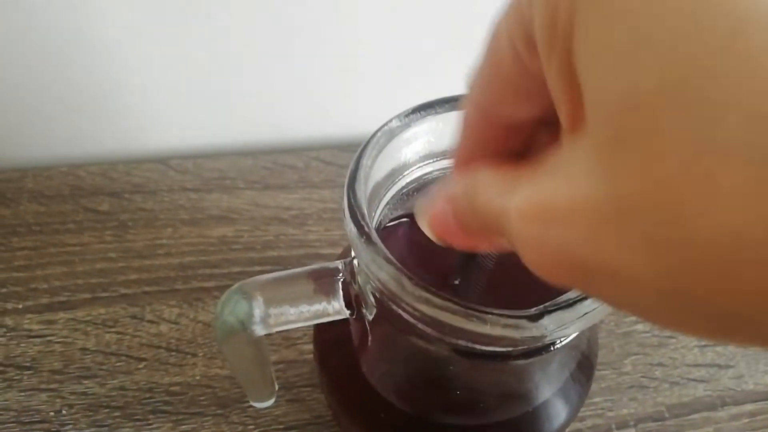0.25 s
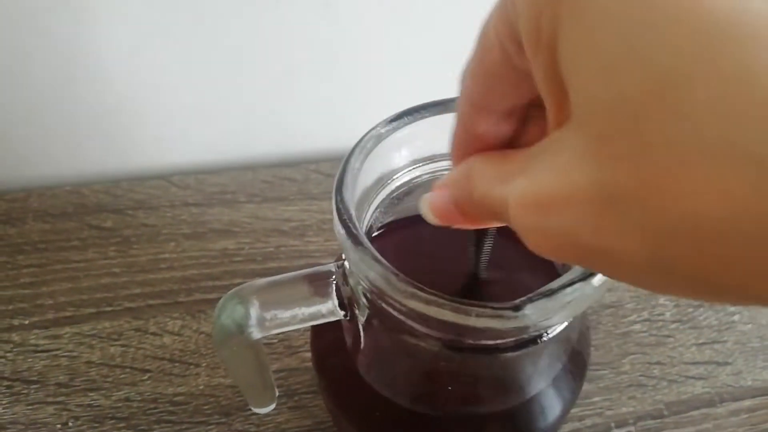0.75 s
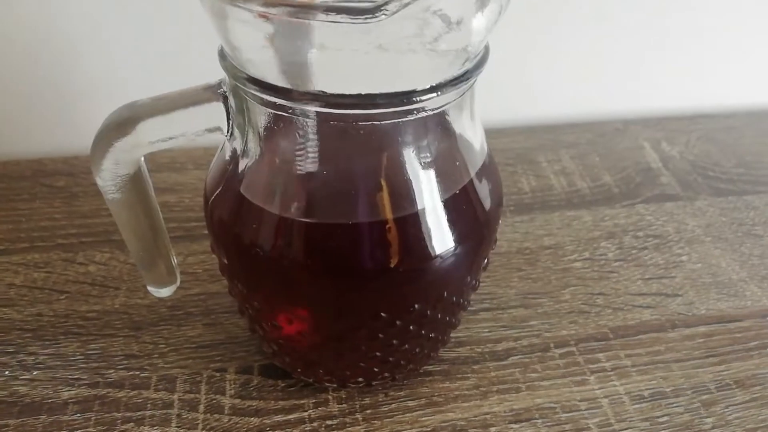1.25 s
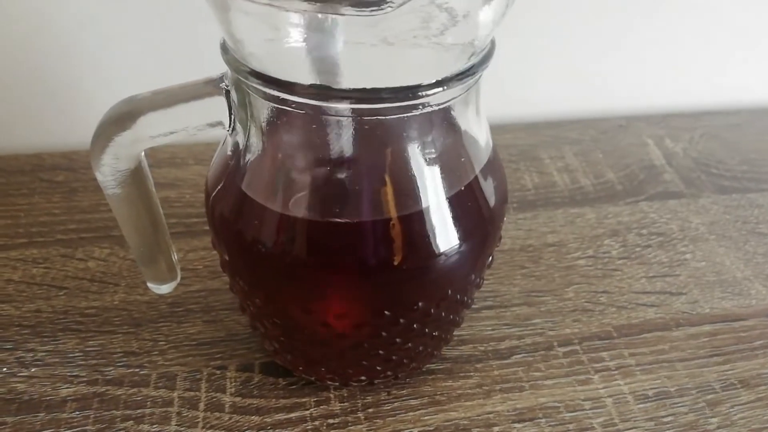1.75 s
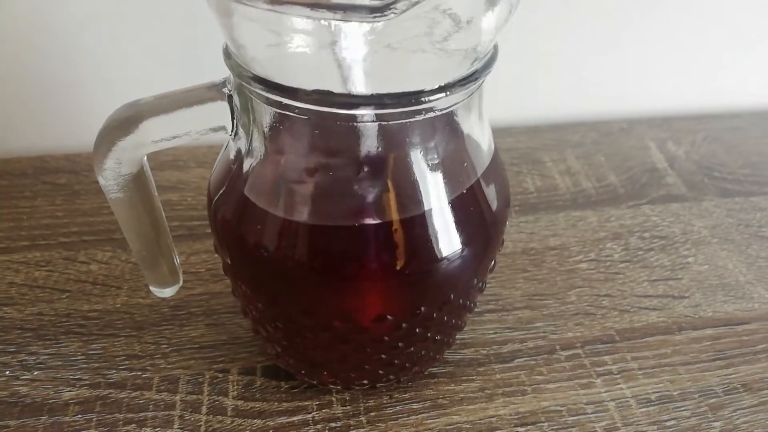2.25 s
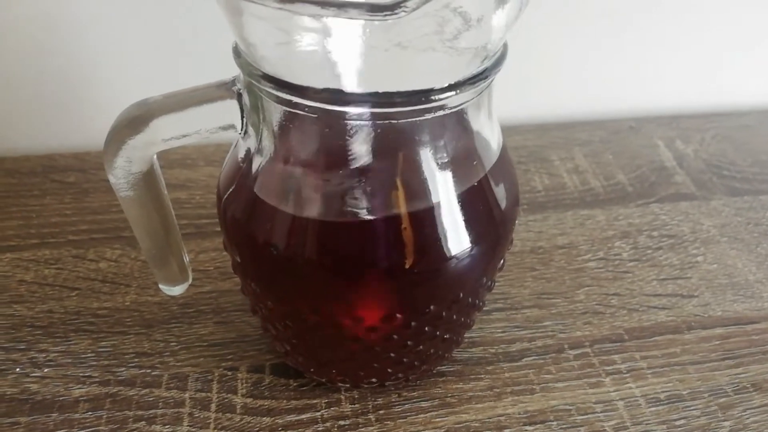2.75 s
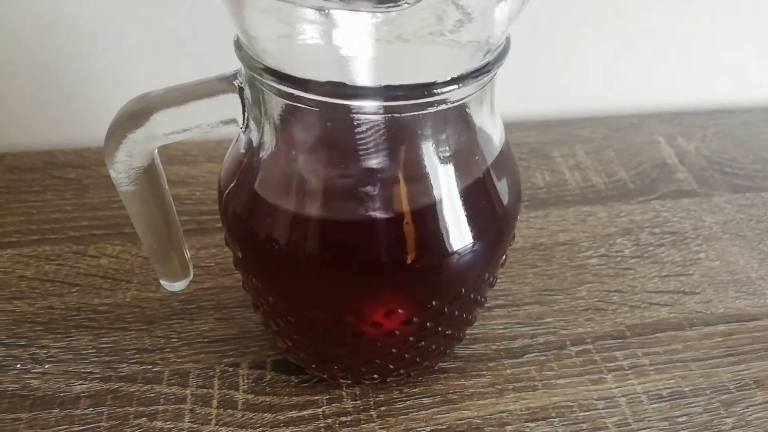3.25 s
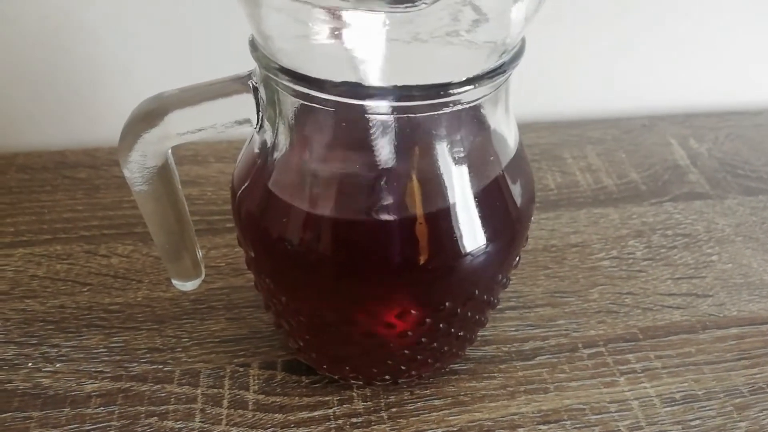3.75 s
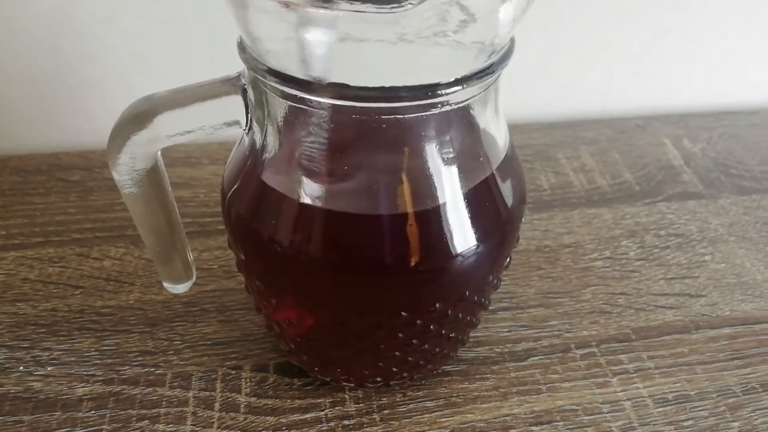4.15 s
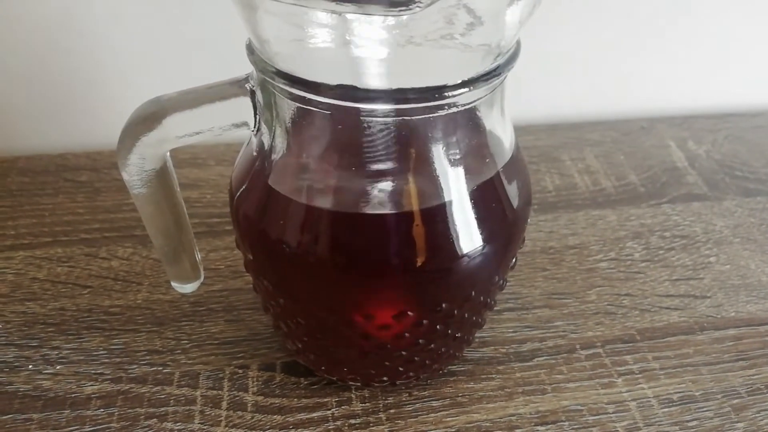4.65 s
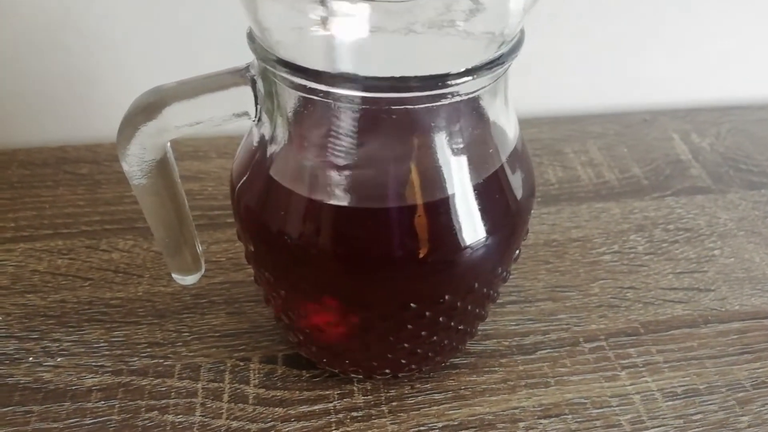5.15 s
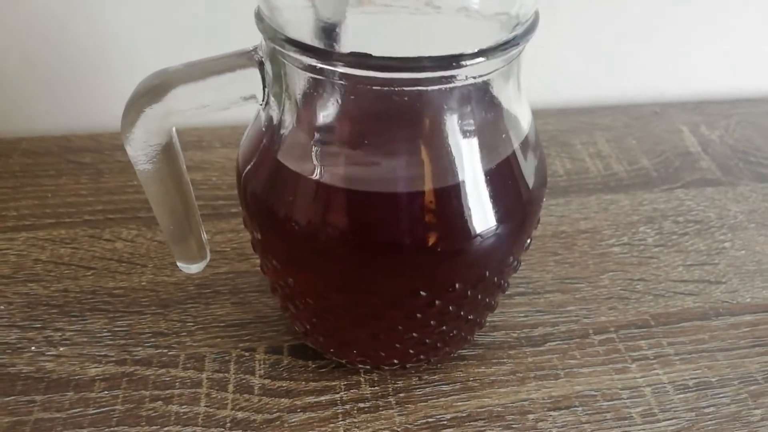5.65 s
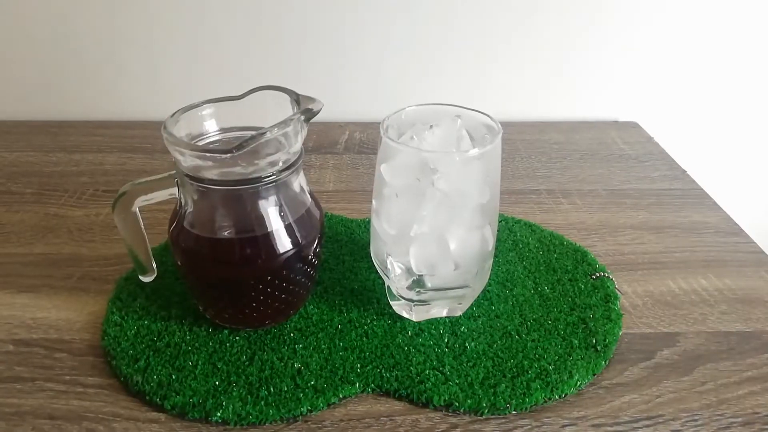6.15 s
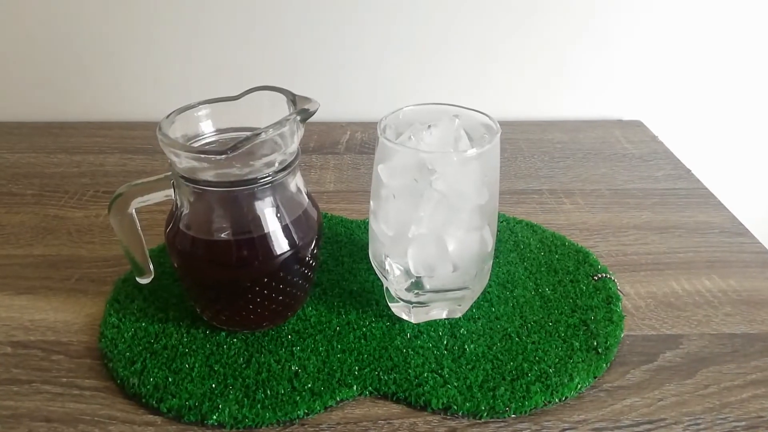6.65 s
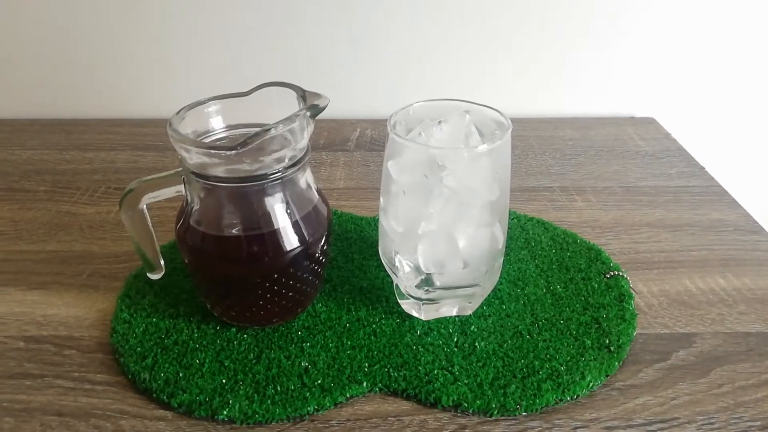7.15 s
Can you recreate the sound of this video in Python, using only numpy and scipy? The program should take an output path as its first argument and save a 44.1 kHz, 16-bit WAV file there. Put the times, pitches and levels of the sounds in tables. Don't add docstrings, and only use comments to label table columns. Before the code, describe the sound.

Irregular bright spoon clinks ring in a glass jug of liquid in a small kitchen, then stop, leaving low rumble and distant bird chirps.

```python
import sys
import numpy as np
from scipy import signal
from scipy.fft import rfft, irfft, next_fast_len
from scipy.io import wavfile
from scipy.ndimage import uniform_filter1d

SR = 44100
rng = np.random.default_rng(int(sys.argv[2]) if len(sys.argv) > 2 else 0)


def voltage_ratio(level):
    return 10 ** (np.asarray(level, float) / 20)


def generate_wav(sig):
    pcm = np.round(np.clip(np.atleast_2d(sig).T, -1, 1) * 32767).astype(np.int16)
    wavfile.write(sys.argv[1], SR, pcm)


N = 325899


def evened(x):
    return x / np.sqrt(np.mean(x ** 2) + 1e-20)


def read(points, hz):
    f, value = np.transpose(points)
    return np.interp(np.log(hz + 1), np.log(f + 1), value)


def add(mix, s, sound):
    part = mix[..., round(s * SR):][..., :sound.shape[-1]]
    part += sound[..., :part.shape[-1]]


def coloured(x, points):
    size = next_fast_len(x.shape[-1])
    gain = voltage_ratio(read(points, np.fft.rfftfreq(size, 1 / SR)))
    return evened(irfft(rfft(x, size) * gain, size)[..., :x.shape[-1]])


def ring(hz, db, t60, pan_db, lead, rise=0.0011, length=0.093):
    t = np.arange(round(length * SR)) / SR
    side = np.array([[.5], [-.5]])
    start, slosh_start, slosh = rng.random((3, len(hz), 1))
    steps = np.arange(0, len(t), 32) / SR
    swing = np.sin(2 * np.pi * ((8 + 25 * slosh) * steps + slosh_start))
    sway = (hz[:, None] / 20000 * swing).repeat(32, 1)[:, :len(t)]
    phase = (sway + 2 * np.pi * (hz[:, None] * t + start)).astype(np.float32)
    decay = np.exp((0.66 * sway - np.log(1000) * t / t60[:, None]).astype(np.float32))
    radiation = voltage_ratio(db + side * pan_db) * np.exp(1j * side * lead)
    sound = radiation.real @ (decay * np.sin(phase)) + radiation.imag @ (decay * np.cos(phase))
    return sound * (1 - np.exp(-t / rise)) * np.minimum((length - t) / 0.063, 1)


def tail(t60s, channels, gap=0.0012):
    shape = (channels, SR // 2)
    taps = rng.choice([-1., 1.], shape) * (rng.random(shape) < 2500 / SR)
    taps[:, :round(gap * SR)] = 0
    hz, t, z = signal.stft(taps, SR, nperseg=128)
    decay = voltage_ratio(-60 * t / read(t60s, hz)[:, None])
    out = signal.istft(z * decay, SR, nperseg=128)[1]
    return out / np.linalg.norm(out[0])


# (f/Hz, T60/s, left-right/dB, left lead/rad, share of the detuning by the swirling drink/1)
GLASS_MODES = [(693, 0.19, 2, 0.2, 0.0), (2828, 0.63, -2, 0.2, 0.3), (2842, 0.7, -7, -0.7, 0.1),
               (5191, 0.115, 11, 1.5, 1.0), (5288, 0.27, 10, 0.5, 0.1), (5502, 0.37, -1, -3.0, 0.0),
               (5773, 0.45, -2, -2.4, 0.3), (6544, 0.18, 1, -2.1, 0.1), (6787, 0.21, 0, -1.6, 0.1),
               (6830, 0.21, -5, -2.0, 0.2),
               (7816, 0.32, -4, -2.1, 0.1), (8168, 0.18, -5, 1.6, 0.1), (8284, 0.24, -5, 1.2, 0.1),
                  (8411, 0.25, -10, -0.2, 0.2), (8587, 0.19, 11, 0.4, 0.0), (8900, 0.21, -3, 0.5, 0.0),
                  (9094, 0.2, 7, -0.0, 0.0), (9410, 0.14, 6, 0.4, 0.2), (9666, 0.22, 8, -1.4, 0.0),
                  (9973, 0.2, 3, 1.8, 0.0),
               (10408, 0.29, 2, -1.9, 0.2), (10462, 0.24, -4, -2.8, 0.0), (10617, 0.22, -6, -3.1, 0.0),
             (10821, 0.21, -7, -0.2, 0.0), (10875, 0.15, -9, 0.2, 0.3), (11814, 0.19, 0, 0.4, 0.2),
             (12677, 0.24, -2, 1.1, 0.0), (13097, 0.2, -9, -2.1, 0.0), (13840, 0.16, 4, -1.3, 0.0),
             (14471, 0.19, 4, 2.9, -0.0),
               (3660, 0.18, 0, -0.1, 0.0), (5447, 0.18, -6, -1.0, 0.0), (7111, 0.18, 0, -1.7, 0.0),
             (9899, 0.18, -2, 2.5, 0.0), (10265, 0.18, -8, -3.1, 0.0), (11622, 0.18, -4, 3.0, 0.0),
             (11983, 0.18, -3, 0.1, 0.0), (12166, 0.18, -7, 2.9, 0.0), (13323, 0.18, -7, 2.3, 0.0),
             (13625, 0.18, -9, -1.9, 0.0), (14018, 0.18, 1, 3.1, 0.0), (14691, 0.18, 0, -2.8, 0.0),
             (15019, 0.18, 2, -0.3, 0.0), (15132, 0.18, 12, -0.7, 0.0)]
JUG_MODES = GLASS_MODES
SPOON_MODES = [(1370, 0.24, -1, -0.0, 0.0), (1807, 0.7, 0, -2.8, 0.0), (3914, 0.46, 1, -1.6, 0.0),
               (4435, 0.39, 2, 2.4, -0.0), (5712, 0.32, -2, 3.0, 0.0), (6280, 0.37, 5, 0.0, 0.0),
               (7756, 0.24, -2, 1.4, 0.0), (9320, 0.22, 3, -0.2, 0.0), (11027, 0.27, -8, 0.4, -0.0),
               (11144, 0.32, -7, 0.2, 0.0), (12380, 0.19, -6, -0.8, 0.0)]
# (t/s, length/s, level/dB)
SLIDES = [(0., 0.62, -76.5), (0.56, 0.069, -70), (1., 12, -78.5), (1.686, 0.64, -76), (1.825, 0.11, -67),
          (2.26, 0.2, -64), (2.787, 0.24, -67), (3.1, 0.083, -71), (3.352, 0.45, -73.5), (3.825, 0.16, -68),
          (4.28, 0.14, -65.5), (5.304, 0.29, -68.5)]


def slide():
    hz, t60, pan_db, lead, _ = np.transpose(JUG_MODES + SPOON_MODES)
    force = voltage_ratio(2.0 * np.minimum(rng.exponential(1, N), 3))
    grit = force * (rng.random(N) < 1500 / SR) * rng.choice([-1, 1], N)
    db = -60 * np.log2(hz / 8500) ** 2 - 3 * rng.random(len(hz))
    body = ring(hz, db, .15 * t60, pan_db, lead, length=.1)
    power = np.zeros(N)
    for s, length, level_db in SLIDES:
        u = np.linspace(0, 1, round(length * SR))
        add(power, s, voltage_ratio(2 * level_db) * np.minimum(u * length / 0.008, 1) * (1 - u ** 3))
    return np.sqrt(abs(power)) * evened(signal.oaconvolve(grit[None], body, axes=1)[:, :N])


# (f/Hz, level per Hz/dB)
HISS_SPECTRUM = [(59, -50), (100, -3), (345, 1), (3380, -7), (6410, -3.5), (7280, -10), (9210, -11),
                 (13500, -20), (16400, -35)]
# (t/s, level/dB)
HISS_LEVEL = [(0., -73.5), (.97, -72.5), (1., -77.5), (5.9, -78)]


def hiss():
    gain = voltage_ratio(np.interp(np.arange(N) / SR, *np.transpose(HISS_LEVEL)))
    return gain * coloured(rng.standard_normal(N), HISS_SPECTRUM) * np.array([[1], [-1]])


# (f/Hz, level per Hz/dB)
BED_SPECTRUM = [(15, -36), (38, 0.5), (50, -2.5), (65, -4.5), (115, -0.5), (200, -6.5), (330, -13.5),
                (450, -19.5), (1050, -21), (1400, -29), (2300, -34.5), (3300, -32), (5200, -32.5),
                (15500, -38.5)]


def bed(level_db=-55.5):
    frames, hz = N // 512 + 6, np.fft.rfftfreq(2048, 1 / SR)
    a, b, patches = rng.standard_normal((frames, len(hz), 3)).T
    patches = evened(uniform_filter1d(uniform_filter1d(patches, 12, 0), 10, 1))
    z = (a + 1j * b) * voltage_ratio(read(BED_SPECTRUM, hz)[:, None] + 1.6 * patches)
    return voltage_ratio(level_db) * evened(signal.istft(z, nperseg=2048, noverlap=1536)[1][:N])


# (start t/s, end t/s, start f/Hz, end f/Hz, level/dB)
DRONES = [
    (-0.16, 4.9, 104, 126, -62.5),
    (0.35, 7.6, 154, 178, -68),
    (5.5, 9.5, 91, 94, -61),
    (1.26, 7.2, 259, 262, -71),
    (6.5, 7.6, 128, 120, -68),
]


def drones(waver_hz=2.525, throb_db=2.0):
    out, now = np.zeros(N), np.arange(N) / SR
    for s0, s1, hz0, hz1, db in DRONES:
        t = np.arange(0, N / SR + .1, .01)
        waver, throb = evened(uniform_filter1d(rng.standard_normal((2, len(t))), 12, 1))
        fade = np.clip(np.minimum(t - s0, s1 - t) / .2, 0, 1)
        hz = np.interp(now, t, np.interp(t, [s0, s1], [hz0, hz1]) + waver_hz * waver)
        gain = np.interp(now, t, fade * voltage_ratio(db + 3 + throb_db * throb))
        out += gain * np.sin(2 * np.pi * np.cumsum(hz) / SR)
    return out


# (t/s, length/s, start f/Hz, end f/Hz, level/dB)
CHIRPS = [(0.388, 0.15, 3910, 5600, -71.5), (.33, 0.07, 6450, 6580, -77), (1.292, 0.028, 5500, 5410, -72),
          (1.996, 0.04, 3600, 3500, -74), (2.804, 0.042, 5350, 4900, -71), (3.727, 0.029, 3600, 3740, -66),
          (3.844, 0.037, 3660, 3830, -72), (4.502, 0.065, 3630, 3490, -66.5),
          (4.587, 0.021, 6500, 5800, -71), (4.892, 0.052, 3640, 3580, -66),
          (5.288, 0.078, 3730, 3350, -65.5), (5.324, 0.06, 3100, 2980, -71), (5.38, 0.054, 6500, 5800, -70),
          (5.383, 0.095, 3900, 4900, -72), (5.483, .045, 4900, 5430, -65), (4.12, 0.045, 3600, 3520, -63),
          (5.957, 0.041, 3200, 2940, -69), (5.974, 0.019, 3120, 2690, -68),
          (5.998, 0.035, 4600, 4480, -69.5), (6.159, 0.063, 5060, 5280, -72),
          (6.21, 0.028, 6500, 5800, -70), (6.392, 0.094, 2970, 3120, -73), (6.587, 0.039, 3160, 2960, -69),
          (6.597, 0.042, 4550, 4650, -68), (6.638, 0.023, 6400, 5070, -67), (6.676, 0.022, 4600, 4580, -73),
          (6.72, .035, 4620, 4530, -77), (6.24, .012, 6400, 6000, -73), (6.76, 0.01, 6400, 5960, -75),
          (6.66, 0.036, 3050, 3130, -72), (6.733, .05, 5700, 5600, -79)]


def whistles():
    out = np.zeros(N)
    for s, length, hz0, hz1, db in CHIRPS:
        hz = np.linspace(hz0, hz1, round(length * SR))
        rasp = voltage_ratio(3.6 * evened(uniform_filter1d(rng.standard_normal(SR), 150))[:len(hz)])
        tone = np.sin(2 * np.pi * np.cumsum(hz) / SR)
        add(out, s, voltage_ratio(db + 2.3) * rasp * tone * signal.windows.tukey(len(hz), .5))
    outdoors = tail([(2000, 0.57), (9000, 0.15)], channels=1)[0]
    return out + voltage_ratio(-2.0) * signal.oaconvolve(out, outdoors)[:N]


# (t/s, length/s, centre f/Hz, width/Hz, level/dB)
CHATTER = [(0.89, 0.31, 4400, 1020, -73.5), (1.18, 0.05, 4500, 800, -75.5), (5.94, .1, 9400, 2000, -71.5),
           (6.46, .06, 9300, 1200, -74), (2.26, 0.11, 4310, 878, -67.5), (2.747, 1.6, 2073, 90, -82.5),
           (3.17, 0.1, 440, 250, -63), (3.909, 0.14, 4470, 600, -72), (4.547, 0.22, 5400, 1800, -71.5),
           (5.296, 0.37, 3250, 1500, -70), (5.922, 0.15, 2940, 1100, -67)]
# (t/s, length/s, centre f/Hz, width/Hz, level/dB)
SQUABBLE = [
    (0.0, 0.25, 4840, 3700, -68),
    (0.0, 0.062, 8500, 4200, -68),
    (0.045, 0.074, 9500, 3200, -69),
    (0.042, 0.3, 2750, 540, -74.5),
]
SQUABBLE_STARTS = [
    6.145,
    6.595,
]
# length/s, f/Hz, width/Hz, level/dB
COO = (0.12, 1870, 81, -76.5)


def chatter(coo_s=5.54, coo_every_s=.425, coos=4):
    squabbles = [(start + s, *rest) for start in SQUABBLE_STARTS for s, *rest in SQUABBLE]
    cooing = [(coo_s + k * coo_every_s, *COO) for k in range(coos)]
    out = np.zeros(N)
    for s, length, hz, width, db in CHATTER + squabbles + cooing:
        band = signal.butter(2, [hz - width / 2, hz + width / 2], "band", fs=SR, output="sos")
        noise = rng.standard_normal((2, 3 * SR // 2))[:, :round(length * SR)]
        size = noise.shape[1]
        flutter = voltage_ratio(3 * evened(uniform_filter1d(noise[1], 300)))
        smooth = uniform_filter1d(noise[1], round(120 * length) + 1)
        streaks = voltage_ratio(2.5 * evened(smooth)[:size // 2 + 1])
        voices = irfft(rfft(noise[0]) * streaks, size)
        call = evened(signal.sosfilt(band, voices) * flutter)
        add(out, s, voltage_ratio(db) * call * signal.windows.tukey(size, .6))
    return out


# (f/Hz, level per Hz/dB)
CRACK_SPECTRUM = [(240, -48), (400, -19.5), (4440, -14.5), (5190, -13.5), (5780, -7), (6850, -3),
                  (7400, -12), (8370, 2.5), (14800, -22), (16000, -36)]


def crack(t60=0.076):
    t = np.arange(4000) / SR
    noise = coloured(rng.standard_normal((2, len(t))), CRACK_SPECTRUM)
    return noise * voltage_ratio(-60 * t / t60) * (1 - np.exp(-t / 0.000078))


# (f/Hz, T60/s, left-right/dB, left lead/rad, first knock level/dB, second knock level/dB)
BOTTOM_MODES = [(1040, 0.072, 10, 1.7, -45, -51), (2854, 0.122, 7, -0.1, -50, -48),
                (3929, 0.082, 9, -2.8, -51, -62), (4438, 0.571, 2, -2.3, -60, -74),
                (5274, 0.092, 10, 0.6, -64, -49), (5740, 0.067, 7, 2.2, -38, -48),
                (6328, 0.072, 13, -3.1, -47, -65), (6535, 0.079, 16, 0.6, -53, -52),
                (6855, 0.076, 1, 1.7, -46, -50), (7190, 0.067, 10, 0.4, -58, -50),
                (8051, 0.067, 5, -1.3, -67, -44), (8442, 0.067, 12, 2.4, -56, -49),
                (8676, 0.067, 6, -1.1, -41, -46), (8940, 0.111, 6, -1.1, -59, -48),
                (9210, 0.08, 0, 0.5, -49, -46), (9463, 0.067, -5, -1.9, -52, -33),
                (9899, 0.071, -4, 1.8, -50, -44), (10672, 0.095, -9, 1.0, -50, -63),
                (11892, 0.095, -1, 1.3, -64, -58), (12080, 0.067, -4, 2.3, -50, -56)]
# (t/s, level/dB)
KNOCKS = [
    [(.437, -18), (.447, -2)],
    [(.699, -15), (.712, -1.5)],
]


def knocks():
    hz, t60, pan_db, lead, *levels = np.transpose(BOTTOM_MODES)
    out, t = np.zeros((2, N)), np.arange(1500) / SR
    life = 1.13 * np.minimum(t60, .13)
    thud = voltage_ratio(-41 - 60 * t / .03) * np.sin(2 * np.pi * 1000 * t) * voltage_ratio(np.array([[3], [-3]]))
    for db, contacts in zip(levels, KNOCKS):
        for (s, gain_db), rise in zip(contacts, (.006, .0005)):
            add(out, s - .001, voltage_ratio(gain_db) * ring(hz, db, life, pan_db, lead, rise, length=.15))
            add(out, s - .001, voltage_ratio(0.78 * gain_db - 38) * crack(t60=0.07))
            add(out, s, voltage_ratio(gain_db) * thud)
    return out


def minor(t60=0.12, count=20):
    place, size, pan, lead, life = rng.random((5, count))
    hz = 3300 + 12200 * place
    db = read(CRACK_SPECTRUM, hz) * .6 - 10 * size
    return ring(hz, db, t60 * (.5 + life), 16 * (pan - .5), 2 * np.pi * lead, rise=0.011, length=0.27)


# (t/s, level/dB, place round the wall/degrees, height on the wall -1..1, part of the spoon -1..1)
STRIKES = [(1.2873, -68, -27.5, 0.4, 0.42), (2.0512, -23.5, 117, -0.28, 0.075),
           (2.5924, -26, -146.9, -0.71, -0.03), (2.6588, -37.5, -47, -0.19, 0.73),
           (2.7594, -49, -50, 0.41, 0.15), (2.8397, -64, -77, -1.1, -0.75), (3.1394, -60, -19, 0.31, 0.32),
           (3.3326, -54.5, -74, 0.1, -0.57), (3.6337, -26, -37.5, 0.12, 0.32),
           (4.0757, -30.5, -154.0, 0.13, -0.84), (4.0787, -23, -154.0, -0.54, -0.43),
           (4.354, -69.5, -88.5, 0.63, 0.27), (4.6388, -58.5, -59.5, 1.0, -0.21),
           (4.777, -43, -80, 0.16, -1.0), (4.8204, -27.5, 38.5, 0.14, 0.53),
           (5.0867, -29, -158.7, -0.24, -0.095), (5.135, -30, -36.5, -0.26, 0.75),
           (5.3994, -67, -88.5, 0.002, -0.26), (5.7229, -25.0, 104.0, -0.79, -0.22)]
# (peak level/dB, lobe
# pairs, phase of the lobes/degrees, slope per height/dB, slope per spoon part/dB)
JUG_SHAPES = [(-22, 2, 16, 3, 3), (-22.9, 1, 72, 6.0, 9.1), (-9.6, 1, 72, 7.2, 9.2),
              (2.6, 1, 160, -11.7, 2.6), (-15.5, 2, 76, 5.7, 3.8), (-14.4, 2, 8, 9.6, 21.4),
              (-19.7, 5, 152, 14.5, 6.6), (-1.8, 2, 80, 0.4, 2.8), (4.0, 1, 72, 1.3, 2.2),
              (-4.0, 5, 172, 9.7, 3.8), (-15.8, 5, 160, 18.2, -5.7), (1.3, 3, 88, 12.6, -5.0),
              (-5.6, 1, 92, -10.7, 7.7), (-2.8, 2, 32, -6.2, 6.7), (-1.5, 7, 160, 3.5, 1.5),
              (-8.8, 1, 88, 3.1, 8.1), (-4.0, 5, 56, -13.2, -15.5), (-3.3, 7, 40, 13.5, -16.8),
              (-4.3, 9, 112, 10.7, -9.4), (-3.5, 7, 64, -3.3, -13.6), (-16.1, 1, 144, -7.7, 0.8),
              (-15.9, 5, 148, 2.6, 10.0), (-17.3, 9, 168, 7.0, 1.8), (-20.1, 2, 64, -4.6, 9.5),
              (-7.8, 12, 56, -14.4, 2.2), (-17.9, 3, 88, 11.2, -3.6), (-16.2, 2, 32, 6.9, 15.0),
              (-19.6, 12, 16, 3.5, 5.5), (-22.5, 3, 96, 4.9, -0.0), (-23.1, 2, 8, 8.6, 13.9),
              (-22.9, 9, 60, 16.2, 2.4), (-15.4, 1, 156, 5.0, 5.1), (-19.8, 7, 56, 10.8, -7.3),
              (-17.5, 2, 56, 5.5, 1.7), (-15.8, 2, 108, -7.9, -12.9), (-23.7, 10, 144, 6.4, -2.3),
              (-19.2, 3, 76, 9.3, -4.0), (-22.2, 5, 144, 18.0, 5.9), (-23.0, 2, 4, 5.2, 13.0),
              (-22.1, 6, 52, 3.0, 0.3), (-22.2, 1, 168, -0.5, -0.4), (-27.7, 1, 92, 0.6, -1.3),
              (-21.6, 2, 8, 7.5, 8.7), (-22.7, 2, 8, 8.8, 13.1)]
SPOON_SHAPES = [(-27.8, 3, 88, 16.3, -1.2), (-30.8, 1, 156, 5.4, 1.0), (-19.8, 2, 68, 10.1, 0.0),
                (-17.5, 11, 172, 12.3, -2.0), (-5.7, 7, 156, 1.1, 21.6), (-11.1, 9, 52, 18.3, 11.2),
                (-5.9, 5, 156, 23.7, 5.4), (-15.9, 3, 84, 13.0, 0.4), (-10.6, 2, 144, -3.8, -1.7),
                (-22.3, 1, 156, -1.7, 0.4), (-21.2, 3, 92, 13.1, 1.3)]


def clinks():
    hz, t60, pan_db, lead, wet = np.transpose(JUG_MODES + SPOON_MODES)
    peak_db, lobes, phase, height_db, part_db = np.transpose(JUG_SHAPES + SPOON_SHAPES)
    wettest, out = hz[np.argmax(wet)], np.zeros((2, N))
    for s, blow_db, place, height, part in STRIKES:
        shape = np.cos(np.radians(np.round(lobes) * place - phase)) ** 2 + .03
        db = peak_db + 20 * np.log10(shape) + height * height_db + part * part_db
        # the tilted drink wets one side more, swinging the wettest mode 46 Hz about 5196 Hz
        shift = (5196 + 46 * np.cos(np.radians(place))) / wettest - 1
        over_db = blow_db + 28
        damping = max(1.62 + 0.02 * over_db, .3)
        crack_db = -12.5 - 0.08 * over_db
        life = np.minimum(t60, 0.46 * np.minimum(hz / 2800, 1)) / np.where(hz < 3500, 1, damping)
        tone = ring(hz * (1 + wet * shift), db, life, pan_db, lead, length=.22)
        add(out, s - .001, voltage_ratio(blow_db - 3.5) * tone)
        add(out, s - .001, voltage_ratio(blow_db + crack_db + 4.5) * crack())
        add(out, s - .001, voltage_ratio(blow_db + crack_db + 2) * minor())
    return out


# (f/Hz, T60/s)
KITCHEN_DECAY = [(500, 0.88), (3000, 0.48), (5200, 0.37), (8000, 0.39), (15000, 0.32)]


def kitchen(sent):
    return signal.oaconvolve(sent, tail(KITCHEN_DECAY, channels=2), axes=1)[:, :N]


def scene(cut_s=5.97):
    wall, bottom = slide() + clinks(), knocks()
    near = wall + bottom + kitchen(voltage_ratio(-6) * wall + voltage_ratio(-17.0) * bottom) + hiss()
    near *= np.clip((cut_s - np.arange(N) / SR) / 0.063, 0, 1) ** 0.14
    return near + bed() + drones() + whistles() + chatter()


def gated(x, depth_db=30, tilt_db=2.5, size=16):
    z = signal.stft(x, nperseg=2048, noverlap=1536)[2]
    bands = (abs(z[:, :1024].mean(0)) ** 2).reshape(-1, size, z.shape[-1]).mean(1)
    level_db = 10 * np.log10(bands + 1e-16)
    top_db = level_db[6:].max(0)
    top_db = np.minimum(top_db, np.roll(top_db, 2))
    octaves = np.log2(np.arange(1, len(bands) + 1)[:, None] / 9)
    limit_db = top_db - depth_db - tilt_db * octaves
    keep = np.clip((level_db - limit_db) / 2 + .5, .05, 1)
    keep[:6] = 1
    z[:, :1024] *= keep.repeat(size, 0)
    return signal.istft(z, nperseg=2048, noverlap=1536)[1][:, :N]


def roll_off(x):
    return signal.sosfilt(signal.butter(12, 16530, fs=SR, output="sos"), x)


def record(dry):
    edge = signal.firwin(301, 15650, width=400, fs=SR)
    limited = signal.oaconvolve(dry, edge[None], "same", axes=1)
    mix = gated(limited + voltage_ratio(-24) * (dry - limited))
    return roll_off(mix)


dry = scene()
out = record(dry)
generate_wav(out)
```